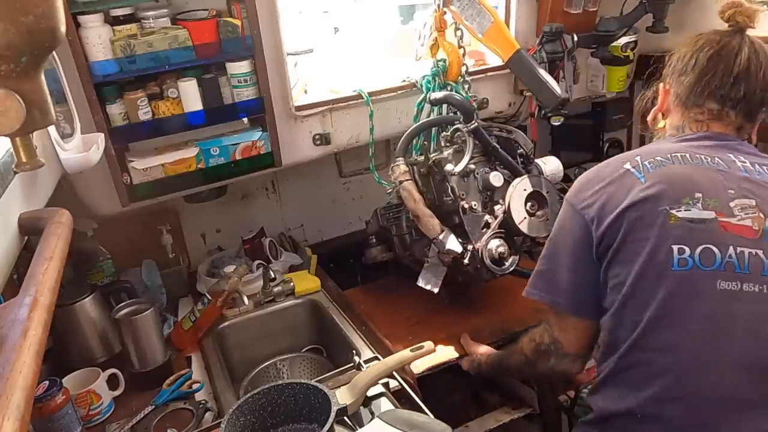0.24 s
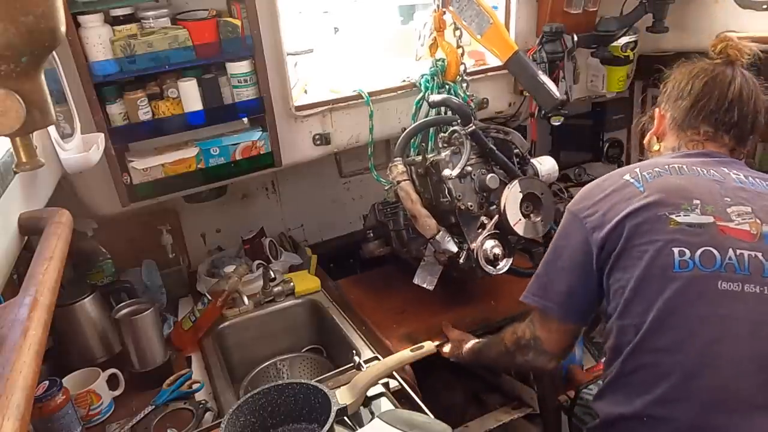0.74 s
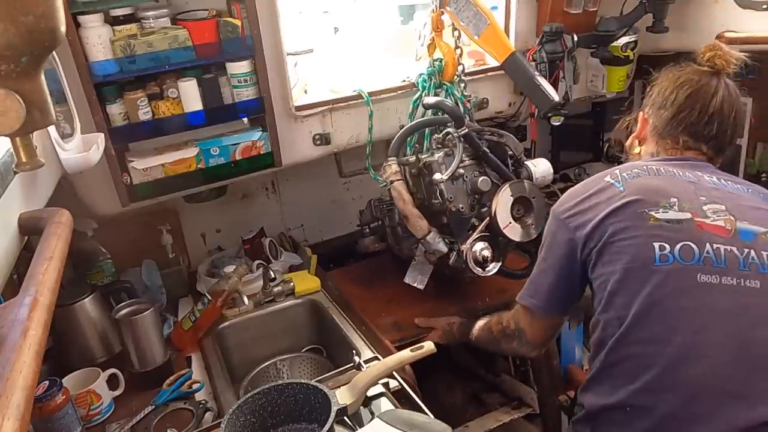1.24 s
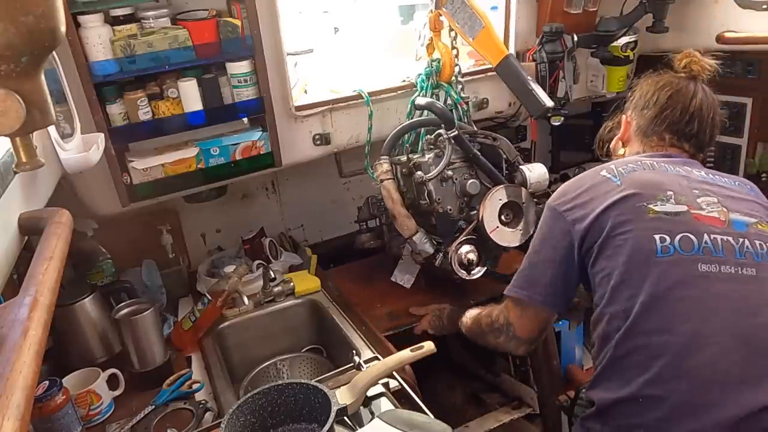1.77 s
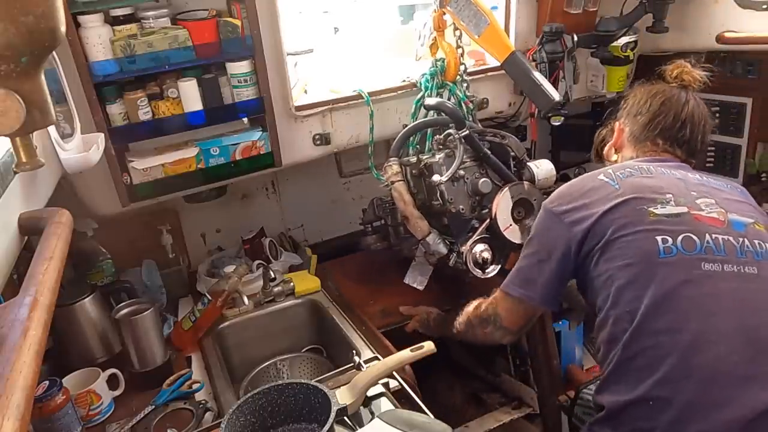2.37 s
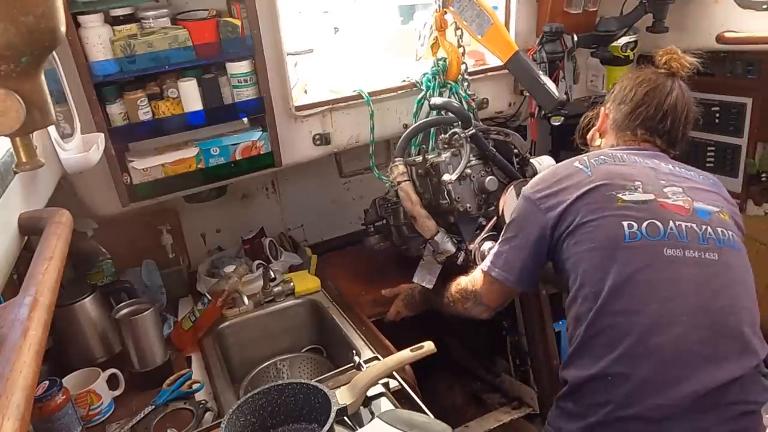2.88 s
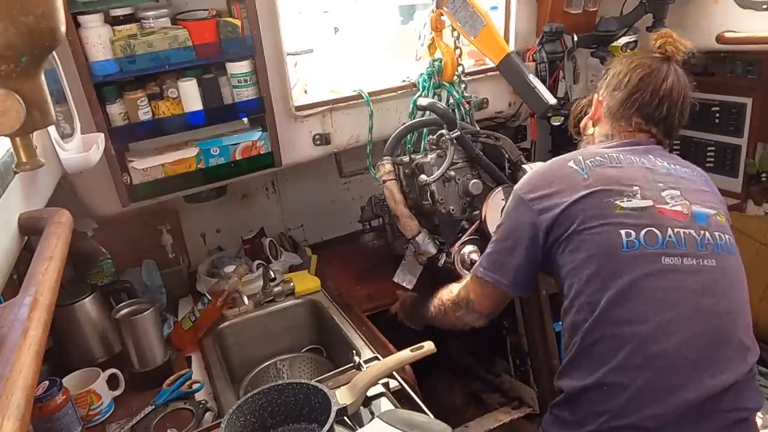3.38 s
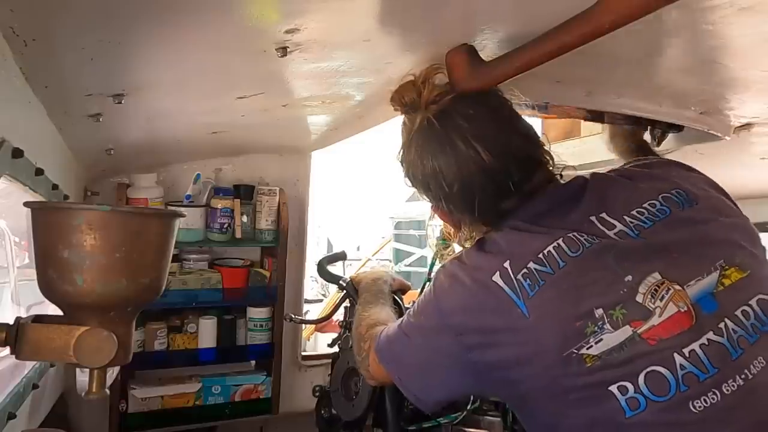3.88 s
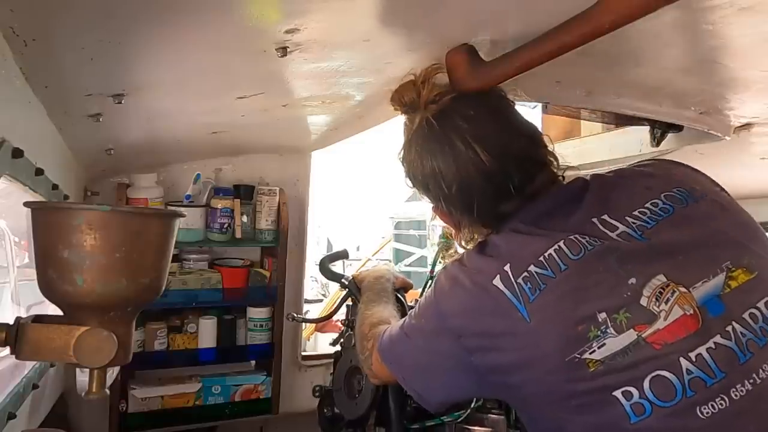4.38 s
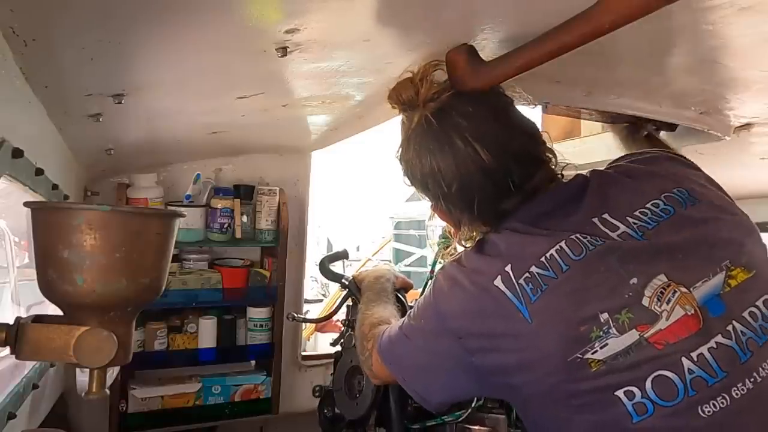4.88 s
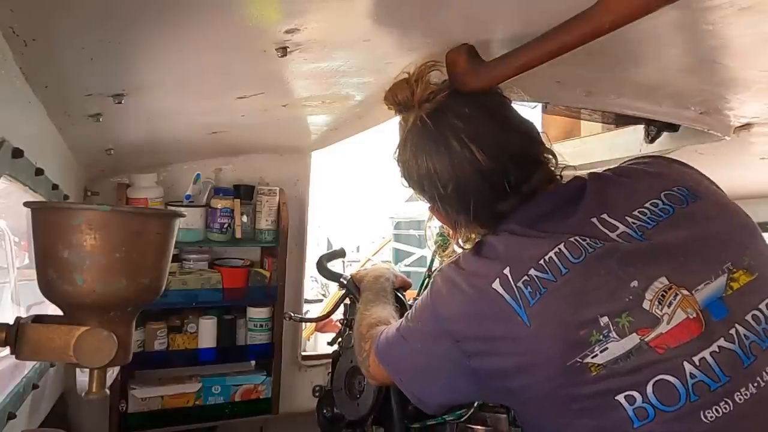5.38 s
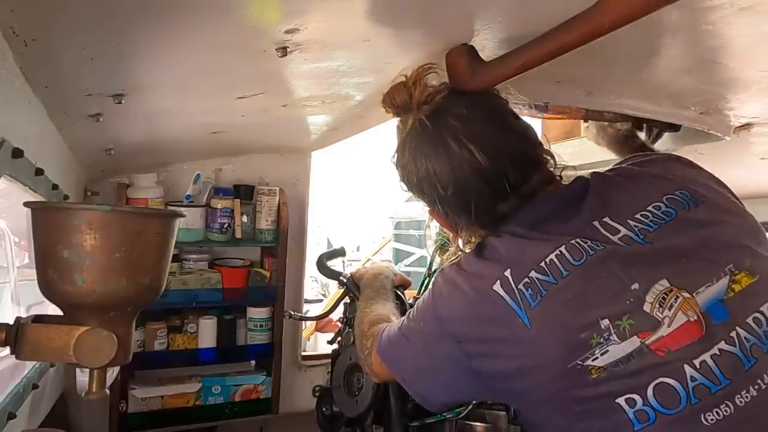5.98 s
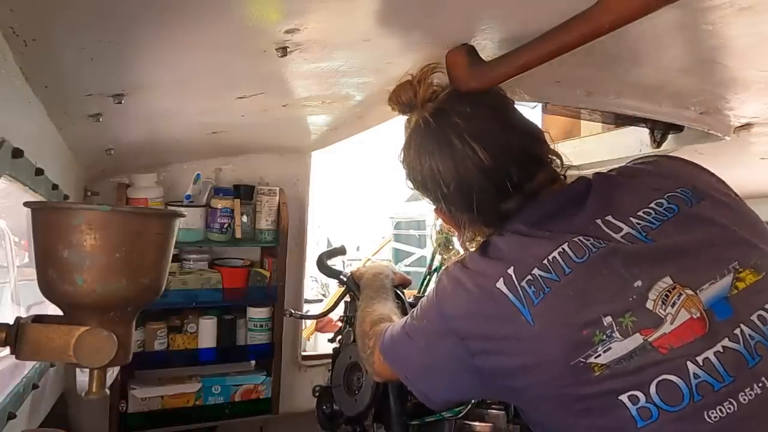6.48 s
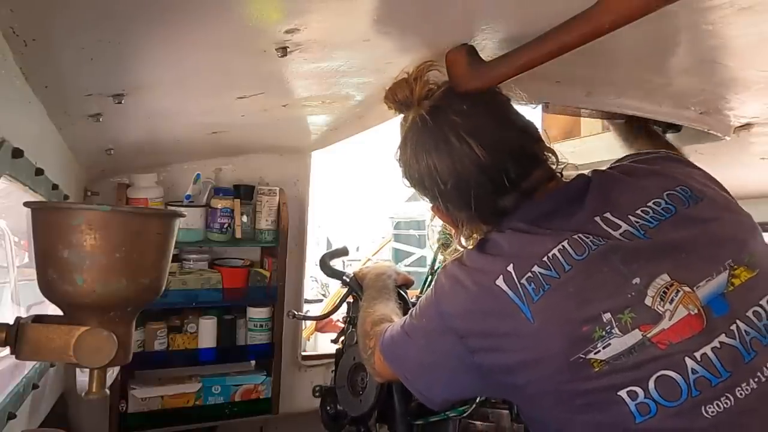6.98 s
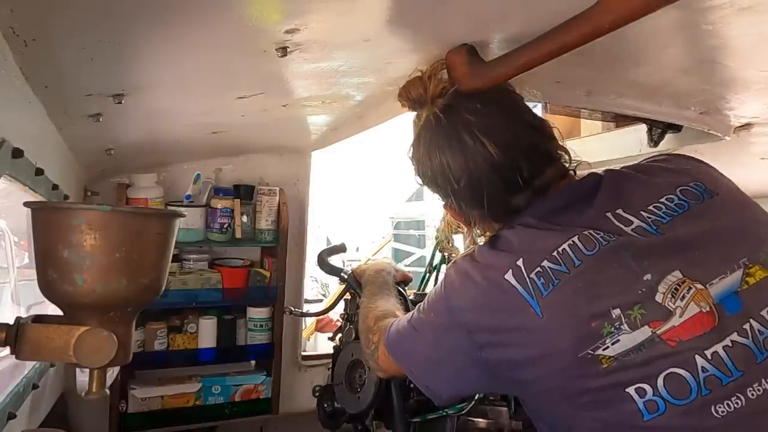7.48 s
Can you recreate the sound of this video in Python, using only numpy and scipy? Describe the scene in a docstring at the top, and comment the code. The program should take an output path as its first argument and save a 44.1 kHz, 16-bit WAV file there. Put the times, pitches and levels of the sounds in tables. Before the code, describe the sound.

First come wooden scrapes, hollow thumps and a few sharp cracks as a board is shoved along, then three brief stuttering groans of stuck wood. After a final knock, a hand-cranked chain hoist takes over, its ratchet snapping in groups of three to five clicks, heavy on the lift and lighter on the return. Links clink and the load bumps the deck. Close, dry, centred sound with short cabin reflections and no speech.

```python
"""A lever chain hoist lifts an engine inside a small wooden boat cabin, over quiet air (coloured noise).
First a wooden counter board is shoved along: noise rubs and rumbles, and ringing modes and noise bursts knock.
Then the board binds under three hard shoves, and stick-slip jerks judder through its resonances.
Last the lever is cranked: two pawls click in turn as noise bursts with ringing modes, over a faint deck rumble;
chain links clink, the load jolts the deck at the changes of stroke, and the taut chain ends up singing."""
import sys
import numpy as np
from scipy import signal
from scipy.fft import rfft, irfft, next_fast_len
from scipy.io import wavfile
from scipy.ndimage import uniform_filter1d

SR = 44100
rng = np.random.default_rng(int(sys.argv[2]) if len(sys.argv) > 2 else 0)


def master(y):
    """Save y as 16-bit WAV."""
    cut = np.clip(np.atleast_2d(y).T, -1, 1)
    pcm = np.round(cut * 32767)  # scale
    wavfile.write(sys.argv[1], SR, pcm.astype(np.int16))


N = 341321
TIME = np.arange(N) / SR  # seconds
BLOW_SIZE = 2 ** 14  # samples that one blow lasts
AGE = TIME[:BLOW_SIZE]  # seconds since a blow

# Event levels are set ahead of each layer's own trim; mode and spectrum levels are relative.
# The board glides, gathering speed and slowing. Each row: time of fastest glide in seconds,
# speeding up in seconds, slowing in seconds, rumble level in dB, rub level in dB.
GLIDES = [(0.05, 0.091, 0.27, -57, -48.5), (0.2, 0.063, 0.066, -29, -44), (0.35, 0.1, 0.063, -22.5, -42),
          (0.55, .06, 0.14, -31.5, -63), (0.68, 0.13, 0.18, -41, -42.5), (0.89, 0.15, 0.13, -35, -60),
          (1.08, 0.11, 0.15, -22, -35), (1.44, .11, 0.097, -31, -51), (1.79, 0.14, 0.12, -34, -35),
          (2.099, 0.13, 0.05, -32.5, -42), (2.53, 0.071, .12, -47, -54.5)]
# The board strikes its frame. Each row: start in seconds, panel and cabin level in dB,
# wood clack level in dB, sharp crack level in dB.
KNOCKS = [(0.15, -16, -44.5, -61), (0.296, -12, -37.5, -50), (0.322, -22.5, -40.5, -43),
          (0.388, -26, -32.5, -42.5), (0.476, -10.5, -36.5, -40), (0.676, -33, -48, -38.5),
          (0.942, -28.5, -36, -48), (1.059, -37, -25.5, -37), (1.114, -9, -16.5, -16.5),
          (1.345, -35, -45.5, -46), (1.376, -33, -44, -41.5), (1.421, -26.5, -48, -48.5),
          (1.462, -36, -43.5, -43), (1.614, -44, -70, -52.5), (1.715, -14.5, -18.5, -16.5),
          (1.815, -25, -40, -42), (1.989, -54, -69, -48.5), (2.0644, -9.5, -19, -27.5),
          (2.217, -41, -63, -51), (3.216, -12.5, -37, -43.5)]
# A hard knock sets one panel or the hull booming. Each row: start in seconds, frequency in Hz,
# level in dB, 60 dB decay in seconds.
BOARD_BOOMS = [(0.31, 104.4, -21, 0.48), (0.49, 101, -25, 0.28), (1.120, 356.4, -19, 0.22),
               (1.728, 616, -19, 0.19), (1.728, 197.5, -13.5, 0.22), (1.817, 233.6, -17, 0.1),
               (2.066, 58, -26, 0.28), (3.220, 285, -22, 0.63), (3.220, 347.6, -18, 0.31)]
# The board binds and is shoved on. Each row: start in seconds, hardest push in seconds, force in dB.
SHOVES = [(2.318, 2.395, -15.5), (2.698, 2.764, -14.5), (2.983, 3.012, -15.5)]
# Loaded pawl on the lifting stroke. Each row: time in seconds, level in dB.
LIFT_CLICKS = [(3.579, -13.5), (3.6413, -8.5), (3.7572, -9.5), (4.5666, -8), (4.6494, -8.5), (4.738, -8.5),
               (5.6043, -8.5), (5.674, -7.5), (5.747, -8), (5.8681, -10), (6.6626, -8), (6.7422, -7.5),
               (6.837, -8.5)]
# Free pawl on the return stroke, always with the same spring force. Each entry: time in seconds.
RETURN_CLICKS = [4.0174, 4.0757, 4.129, 4.1987, 4.3133, 5.1158, 5.1759, 5.236, 5.3525, 6.0779, 6.15, 6.2088,
                 6.274, 6.3479, 7.2101, 7.2874, 7.3452, 7.4232]
# Chain links shifting. Each row: time in seconds, level in dB.
LINK_CLINKS = [(3.8377, -30), (3.8902, -23.5), (3.9074, -16.5), (3.9556, -23), (4.4127, -28), (4.4443, -21),
               (4.4654, -24.5), (4.5239, -20.5), (4.973, -35), (5.0177, -20), (5.035, -9), (5.4586, -33),
               (5.4839, -15.5), (5.5636, -21.5), (5.935, -25.5), (5.9578, -21), (5.9826, -27.5),
               (6.532, -26.5), (6.553, -10.5), (6.621, -22.5), (7.0749, -20), (7.0885, -13), (7.1441, -17),
               (7.65, -16), (7.6868, -18)]
# A link swings free and rings alone. Each row: start in seconds, frequency in Hz, level in dB,
# 60 dB decay in seconds.
LINK_PINGS = [(3.838,4950,-25.5,0.11),(3.838,6840,-30.5,0.088),(6.150,5240,-10,0.083),(6.276,4470,-23,0.13),(7.143,3600,-24.5,0.21),(7.211,5240,-17,0.12),(7.346,4420,-21,0.16)]
# The lever takes up the load and jolts the deck. Each row: start in seconds, boom and thud level in dB,
# hollow clack level in dB.
JOLTS = [(3.918, -24, -37), (4.419, -32.5, -35.5), (5.04, -24.5, -32.5), (5.476, -38, -33),
         (5.961, -32, -39), (6.544, -30.5, -31.5), (7.104, -25, -40), (7.652, -27, -37.5)]
# Chain and hook sing faintly as they creep. Each row: time in seconds, level in dB.
SINGING = [(7.05,-59),(7.2,-40),(7.5,-52),(7.62,-45),(7.74,-44)]

# Ringing modes of the board, its wood clack, the deck, the two pawls, a link and the creeping chain.
# Each row: frequency in Hz, level in dB.
BOARD_MODES = [(146,-6),(194,-1),(215,0),(235,-3),(273,-1),(291,-2),(369,-8)]
CLACK_MODES = [(470,-6.5),(545,-0.5),(625,3.5),(860,-1),(1040,-1),(1297,1.5),(1420,-4),(2050,-2)]
DECK_MODES = [(140,-3.5),(165,0.5),(215,-5.5),(345,1),(380,-7.5)]
LIFT_MODES = [(1554,2),(1650,0.5),(1720,5.5),(1780,-2),(2208,3.5),(2274,-1),(2328,12),(2410,-5.5),(2756,-8),(2880,0.5),(3459,-1.5),(3640,0),(3859,-2.5),(4394,2),(4600,-7.5)]
RETURN_MODES = [(2525,17),(3460,11),(4301,-20),(4394,24),(4480,-7),(4630,-15),(5160,-1.5),(5261,-2)]
LINK_MODES = [(1600,4),(1720,8),(2120,-3.5),(2290,4.5),(2700,3.5),(3000,-23.5),(3420,-12),(3900,-14),(5100,-1.5)]
CREEP_MODES = [(1518,10),(2116,4),(2272,4),(2750,-12),(3365,5),(3560,-19),(5233,5.5)]

# Noise spectra: cabin air, sliding rumble, light rub, rasp of the binding board, cabin boom, deep thud,
# wood clack, sharp crack, steel body, bright steel edge, deck thud, hollow clack.
# Each row: frequency in Hz, density in dB.
AIR_SPECTRUM = [(20,-5),(60,1),(130,6),(350,6),(600,-5.5),(1200,-9),(3000,-13),(6000,-24.5),(9000,-39),(15000,-61)]
RUMBLE_SPECTRUM = [(25,-34),(60,-22.5),(105,-1.5),(150,1),(210,0),(290,1.5),(420,-33),(700,-54)]
RUB_SPECTRUM = [(350,-15),(600,-1),(1300,1),(2800,-2.5),(4500,-6.5),(6500,-16.5),(9000,-33.5),(14000,-55.5)]
RASP_SPECTRUM = [(350,-8),(600,5),(1200,0),(2800,-5),(4500,-15.5),(6500,-26),(9000,-42),(14000,-60)]
CABIN_SPECTRUM = [(110,-10),(150,1),(220,2),(300,-1),(390,-4),(480,-15.5),(700,-18.5)]
THUD_SPECTRUM = [(30,-30),(60,-26),(80,2),(103,-1.5),(145,8),(180,-8.5),(300,-37.5)]
CLACK_SPECTRUM = [(250,-28.5),(450,-1),(750,1.5),(1300,5),(2000,-4.5),(2800,-16.5),(4500,-15)]
CRACK_SPECTRUM = [(1200,0),(2600,5.5),(3700,0.5),(5000,-6),(7000,-18),(9000,-39.5),(14000,-56)]
STEEL_SPECTRUM = [(300,-5.5),(600,-9.5),(1050,-9),(1500,0.5),(2400,5),(3600,5.5),(4300,-1),(5500,-20.5)]
EDGE_SPECTRUM = [(3000,-37),(4300,4.5),(5400,2),(6200,-4),(7300,-4.5),(8200,-12.5),(8800,-19.5),(9050,-24),(9500,-17),(10600,-18),(11600,-28.5),(13800,-29),(15500,-58)]
DECK_SPECTRUM = [(30,-20),(60,-7),(100,-0.5),(145,11),(220,4.5),(380,-1),(600,-21.5)]
HOLLOW_SPECTRUM = [(200,-19),(400,-16),(600,-1),(900,-16),(1500,-19.5),(3000,-58)]

AIR_DB = -51
GLIDE_SWELL_DB, GLIDE_ROUNDNESS = 17, 1.4  # rise and fall of a glide; roundness 1 is pointed, 2 round
HANDLING_END_S, HANDLING_RUMBLE_DB, HANDLING_RUB_DB = 4, -49, -75.5  # faint stir of handling until then
RUB_FLICKER_DB, RUB_FLICKERS_PER_S = 1, 22  # uneven contact, so the rub comes and goes
GRIP_DB_PER_S, GRIP_BELOW_PEAK_DB, LET_GO_DB_PER_S = 806, 7, 225  # rise, start and fall of a shove
THUD_DB, THUD_FOLLOWS = -19, 0.59  # thud of a 0 dB knock; share of the knock's dB that it follows
STRAIN_DB, STRAIN_S = -51, 0.19  # deck rumble; time over which it swells and fades
RETURN_DB, SLOW_TOOTH_LOSS_DB_PER_S = -15, 21  # a later tooth, as the lever slows, clicks more softly
TOOTH_S, STROKE_GAP_S = 0.062, 0.3  # usual time between teeth; a longer pause means a new stroke
CUTOFF_HZ = 16500


def amp(db):
    """Decibels to gain."""
    return np.exp(np.asarray(db) * np.log(10) / 20)


def unit(x):
    """Scale to rms 1."""
    return x / np.sqrt(np.mean(x ** 2) + 1e-20)


def add(track, s, sound):
    """Mix a sound into a track at time s."""
    i = max(int(s * SR), 0)
    track[i:i + len(sound)] += sound[:N - i]


def colour(x, spectrum):
    """Give a steady signal a spectrum; rms 1."""
    hz, db = np.transpose(spectrum)
    size = next_fast_len(len(x))
    f = np.arange(size // 2 + 1) * SR / size + 1
    gain = amp(np.interp(np.log(f), np.log(hz), db, left=-70, right=-70))
    return unit(irfft(rfft(x, size) * gain, size)[:len(x)])


def noise(spectrum, size=BLOW_SIZE):
    """Coloured noise, rms 1."""
    return colour(rng.standard_normal(size), spectrum)


def even(x, window_s):
    """Hold the short-term level of a signal near 1."""
    power = uniform_filter1d(x ** 2, max(int(window_s * SR), 2))
    return x / np.sqrt(np.abs(power) + 1e-9)


def ripple(x, depth_db, width_hz):
    """Each point of contact favours some resonances and starves others."""
    size = next_fast_len(len(x))
    spec = rfft(x, size)
    f = np.arange(len(spec)) * SR / size
    knots = np.arange(0, SR / 2, width_hz)
    favour = np.interp(f, knots, rng.standard_normal(len(knots)))
    return irfft(spec * amp(depth_db * favour), size)[:len(x)]


def fade(rise_s, t60, tail_db=-26, tail_t60=0.22):
    """Reflections fill the cabin within moments, then die away over a faint tail."""
    decay = np.hypot(amp(-60 * AGE / t60), amp(tail_db - 60 * AGE / tail_t60))
    return (1 - np.exp(-AGE / rise_s)) * decay


def strike(modes, rise_s, t60, scatter_db, detune):
    """One blow on a body: each mode gets its own strength and a pitch that shifts with the contact."""
    hz, db = np.transpose(modes)[:, :, None]
    strength, shift = rng.standard_normal((2, len(modes), 1))
    turns = hz * (1 + detune * shift) * AGE + rng.random((len(modes), 1))
    gain = amp(db + scatter_db * np.clip(strength, -2, 2))
    rings = (gain * np.sin(2 * np.pi * turns)).sum(axis=0)
    rings = rings * (1 - np.exp(-AGE / rise_s)) * amp(-60 * AGE / t60)
    return rings / np.std(rings[:SR // 20])  # level over the first 50 ms


def resonate(x, hz, width_hz):
    """A two-pole resonance."""
    r = np.exp(-np.pi * width_hz / SR)
    return signal.lfilter([1, 0, -1], [1, -2 * r * np.cos(2 * np.pi * hz / SR), r * r], x)


def cabin_air():
    """The quiet air of the cabin is steady coloured noise."""
    return amp(AIR_DB) * noise(AIR_SPECTRUM, size=N)


def glide_levels():
    """Strength of rumble and rub: one swell for each glide, over the faint stir of handling."""
    handled = TIME < HANDLING_END_S
    rumble, rub = amp(HANDLING_RUMBLE_DB) * handled, amp(HANDLING_RUB_DB) * handled
    for s, speeding_s, slowing_s, rumble_db, rub_db in GLIDES:
        away = np.maximum((s - TIME) / speeding_s, (TIME - s) / slowing_s)
        swell = amp(-GLIDE_SWELL_DB * np.clip(away, 0, 4) ** GLIDE_ROUNDNESS)
        rumble = np.hypot(rumble, amp(rumble_db) * swell)
        rub = np.hypot(rub, amp(rub_db) * swell)
    flicker = np.interp(TIME * RUB_FLICKERS_PER_S, np.arange(BLOW_SIZE), rng.standard_normal(BLOW_SIZE))
    return rumble, rub * amp(RUB_FLICKER_DB * flicker)


def shove_force():
    """Force on the binding board: each shove grips fast, builds to its hardest push and lets go."""
    force = 0
    for start, hardest, peak_db in SHOVES:
        build = np.interp(TIME, [start, hardest], [-GRIP_BELOW_PEAK_DB, 0])
        grip, let_go = np.maximum(start - TIME, 0), np.maximum(TIME - hardest, 0)
        force = force + amp(peak_db + build - GRIP_DB_PER_S * grip - LET_GO_DB_PER_S * let_go)
    return force


def friction(spectrum):
    """Wood fibres catch and let go in countless tiny slips of uneven size."""
    slips = (rng.random(N) < 5000 / SR) * rng.standard_normal(N)  # 5000 slips per second
    sizes = amp(2.5 * np.minimum(rng.exponential(1, N), 4))
    return unit(ripple(colour(slips * sizes, spectrum), depth_db=3, width_hz=110))


def judder(slips_per_s, damping):
    """Uneven stick-slip jerks ring the board's modes, damped by the hand; level near 1."""
    slips = (rng.random(N) < slips_per_s / SR) * rng.standard_normal(N) + 1e-18
    rings = sum(amp(db) * resonate(slips, hz, width_hz=12 * damping) for hz, db in BOARD_MODES)
    # wood gives, so the jerks are blunt
    blunt = signal.sosfilt(signal.butter(2, [150, 330], "band", fs=SR, output="sos"), rings)
    return even(blunt, 0.024)


def board(judder_db=0, rasp_db=-16, rumble_db=-4, rub_db=0, shove_rumble_db=-14, rumble_follows=0.71):
    """The board slides lightly with rumble and rub, and judders and rasps where it binds."""
    rumble, rub = glide_levels()
    force = shove_force()
    rumble = np.hypot(rumble, amp(shove_rumble_db) * force ** rumble_follows)
    slide = amp(rumble_db) * rumble * even(noise(RUMBLE_SPECTRUM, size=N), 0.066)
    slide = slide + amp(rub_db) * rub * friction(RUB_SPECTRUM)
    shake = judder(slips_per_s=400, damping=0.76)
    rasp = friction(RASP_SPECTRUM) * (1 + 0.4 * shake)  # the rasp throbs with the judder
    return slide + force * (amp(judder_db) * shake + amp(rasp_db) * rasp)


def knocks(body_db=-9, cabin_db=-7, clack_db=1, ring_db=-6, crack_db=0, snap_db=10):
    """A hard edge cracks first; the panel and the cabin's low modes swell a little later."""
    out = np.zeros(N)
    for s, peak_db, wood_db, sharp_db in KNOCKS:
        panel = strike(BOARD_MODES, rise_s=0.005, t60=0.23, scatter_db=2, detune=0.025)
        cabin = even(noise(CABIN_SPECTRUM), 0.017) * fade(0.0035, 0.27)
        body = amp(peak_db) * (amp(body_db) * panel + amp(cabin_db) * cabin)
        thud = even(noise(THUD_SPECTRUM), 0.015) * fade(0.012, 0.35)
        thud = amp(THUD_DB + THUD_FOLLOWS * peak_db) * thud
        clack = ripple(noise(CLACK_SPECTRUM), depth_db=3, width_hz=60)
        ring = strike(CLACK_MODES, rise_s=0.003, t60=0.19, scatter_db=3, detune=0.008)
        wood = amp(clack_db) * even(clack, 0.011) * fade(0.0008, 0.18) + amp(ring_db) * ring
        crack = unit(ripple(noise(CRACK_SPECTRUM), depth_db=3, width_hz=120))
        # a very short snap on top of the longer crack
        crack = crack * (amp(crack_db) * fade(0.002, 0.16) + amp(snap_db) * fade(0.001, 0.018))
        add(out, s, body + thud + amp(wood_db) * wood + amp(sharp_db) * crack)
    return out


def lone_modes(events):
    """Now and then one panel or link rings out above the rest: a decaying sine."""
    out = np.zeros(N)
    for s, hz, db, t60 in events:
        envelope = amp(db - 60 * AGE / t60) * (1 - np.exp(-AGE / 0.0018))
        add(out, s, np.sin(2 * np.pi * hz * AGE) * envelope)
    return out


def strain():
    """The deck rumbles faintly under the hoist while the pawls work, swelling around each click."""
    working = np.zeros(N)
    swell = np.hanning(int(STRAIN_S * SR))
    for s in RETURN_CLICKS + [s for s, _ in LIFT_CLICKS]:
        add(working, s - STRAIN_S / 2, swell)
    return amp(STRAIN_DB) * np.sqrt(working) * noise(THUD_SPECTRUM, size=N)


def return_strokes():
    """Time and dB of each free-pawl click: the slower the lever passes a tooth, the softer the click."""
    wait = np.diff(RETURN_CLICKS, prepend=0)
    wait = np.where(wait > STROKE_GAP_S, TOOTH_S, wait)
    return zip(RETURN_CLICKS, RETURN_DB - SLOW_TOOTH_LOSS_DB_PER_S * (wait - TOOTH_S))


def steel(events, modes, body_db, ring_db, edge_db, deck_db, rise_s, t60, lead_s, ring_t60, detune):
    """Steel on steel: a few clear modes, a dense cloud of others, and a weak boom through the deck."""
    out = np.zeros(N)
    same_body, same_edge = noise(STEEL_SPECTRUM), noise(EDGE_SPECTRUM)  # the same parts ring on every click
    for s, peak_db in events:
        # each click catches a different tooth or link, so its colour shifts
        body = ripple(same_body + noise(STEEL_SPECTRUM), depth_db=3, width_hz=90)
        edge = ripple(same_edge + noise(EDGE_SPECTRUM), depth_db=3.5, width_hz=130)
        body = even(body, 0.012) * fade(rise_s, t60)
        edge = even(edge, 0.035) * fade(rise_s, 0.93 * t60)
        ring = strike(modes, rise_s, ring_t60, scatter_db=4, detune=detune)
        deck = strike(DECK_MODES, rise_s=0.018, t60=0.21, scatter_db=2, detune=0.015)
        click = amp(body_db) * body + amp(ring_db) * ring + amp(deck_db) * deck + amp(edge_db) * edge
        add(out, s - lead_s, amp(peak_db) * click)  # begins just ahead of the listed time
    return out


def hoist():
    """The loaded pawl rings low and full, the free one thin and bright; links clink between strokes."""
    lift = steel(LIFT_CLICKS, LIFT_MODES, body_db=-6.5, ring_db=-11, edge_db=-9.5, deck_db=-33.5,
                 rise_s=0.0018, t60=0.17, lead_s=0.00097, ring_t60=0.13, detune=0.00946)
    back = steel(return_strokes(), RETURN_MODES, body_db=-0.5, ring_db=-24.5, edge_db=3.5, deck_db=-27.5,
                 rise_s=0.0048, t60=0.14, lead_s=0.00132, ring_t60=0.21, detune=0.0041)
    links = steel(LINK_CLINKS, LINK_MODES, body_db=-7, ring_db=-17, edge_db=-17.5, deck_db=-40,
                  rise_s=0.0033, t60=0.18, lead_s=0.002, ring_t60=0.11, detune=0.015)
    return lift + back + links


def jolts(boom_db=-8, thud_db=-1, clack_db=2):
    """The weight of the engine jerks the deck that carries the hoist: boom, thud and hollow clack."""
    out = np.zeros(N)
    for s, peak_db, hollow_db in JOLTS:
        boom = amp(boom_db) * strike(DECK_MODES, rise_s=0.002, t60=0.18, scatter_db=2, detune=0.03)
        thud = amp(thud_db) * even(noise(DECK_SPECTRUM), 0.035) * fade(0.003, 0.3)
        clack = amp(hollow_db + clack_db) * even(noise(HOLLOW_SPECTRUM), 0.048) * fade(0.0035, 0.19)
        add(out, s, amp(peak_db) * (boom + thud) + clack)
    return out


def singing():
    """The taut chain creeps and keeps its links faintly ringing: noise through narrow resonances."""
    creep = rng.standard_normal(N)
    rings = sum(amp(db) * resonate(creep, hz, width_hz=110) for hz, db in CREEP_MODES)
    mellow = signal.sosfilt(signal.butter(2, 6000, fs=SR, output="sos"), rings)
    s, db = np.transpose(SINGING)
    level_db = np.interp(TIME, s, db, left=-200, right=-200)  # silent outside the listed times
    return amp(level_db) * unit(mellow)


def scene():
    """Everything is heard from one spot, alike in both ears, over the quiet air of the cabin."""
    woodwork = board() + knocks() + lone_modes(BOARD_BOOMS)
    lifting = strain() + hoist() + lone_modes(LINK_PINGS) + jolts() + singing()
    return np.tile(cabin_air() + woodwork + lifting, (2, 1))


def record(dry):
    """The highest peaks are rounded and the top is cut."""
    rounded = dry / (1 + dry ** 4) ** 0.25
    return signal.sosfilt(signal.cheby2(12, 70, CUTOFF_HZ, fs=SR, output="sos"), rounded)


dry = scene()
out = record(dry)
master(out)
```